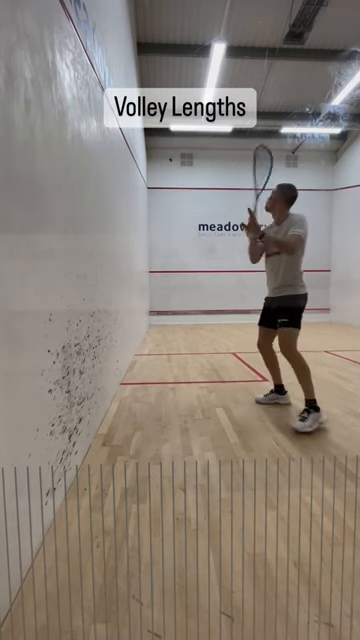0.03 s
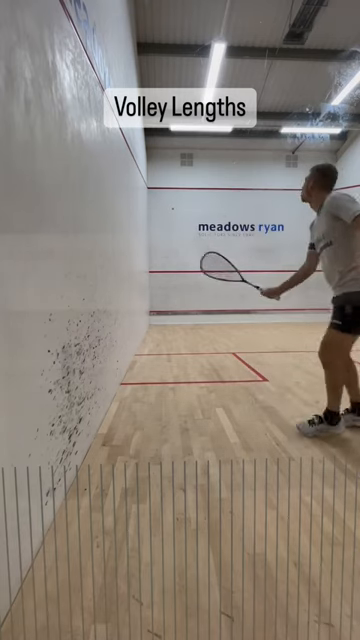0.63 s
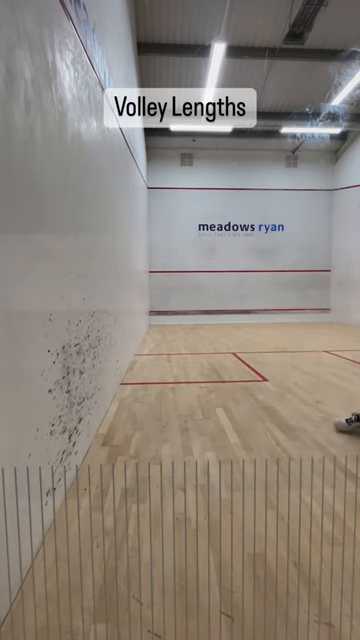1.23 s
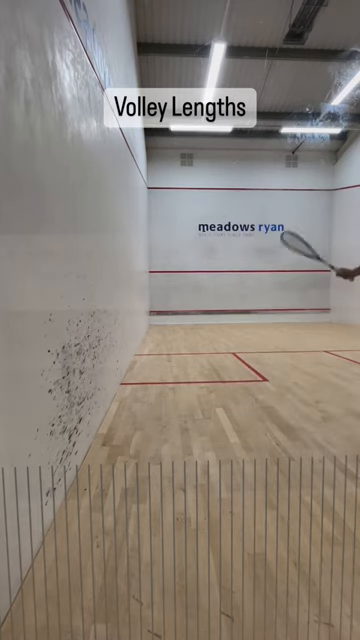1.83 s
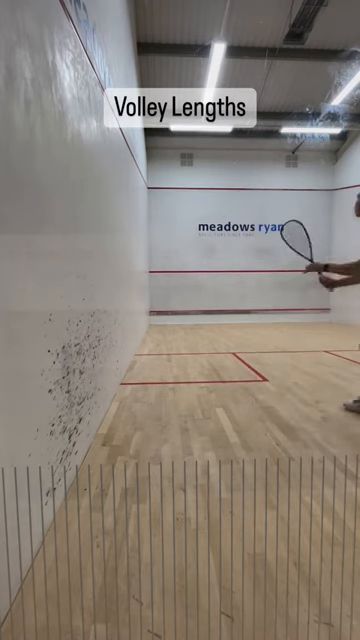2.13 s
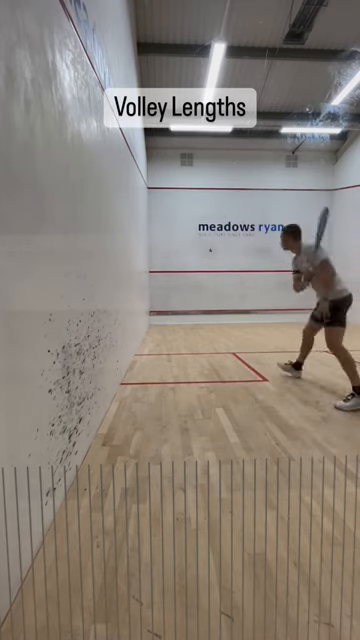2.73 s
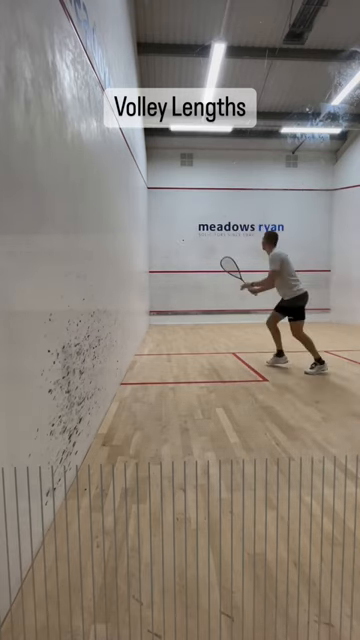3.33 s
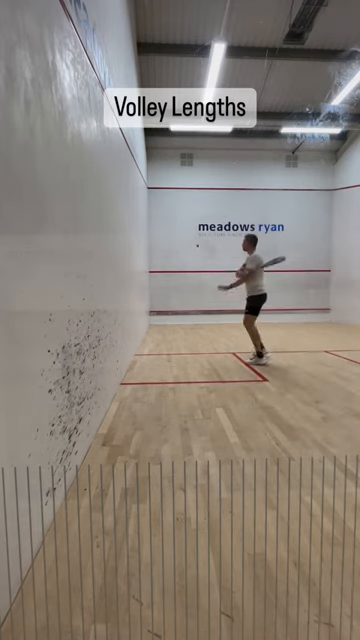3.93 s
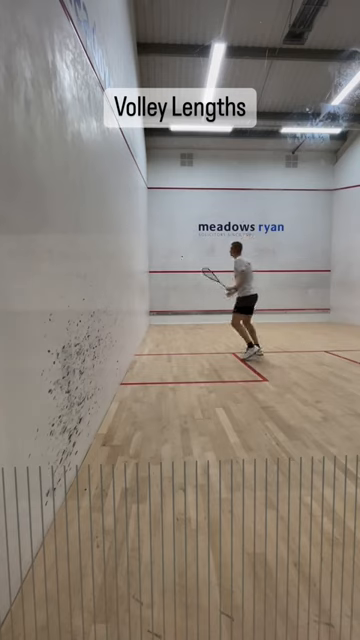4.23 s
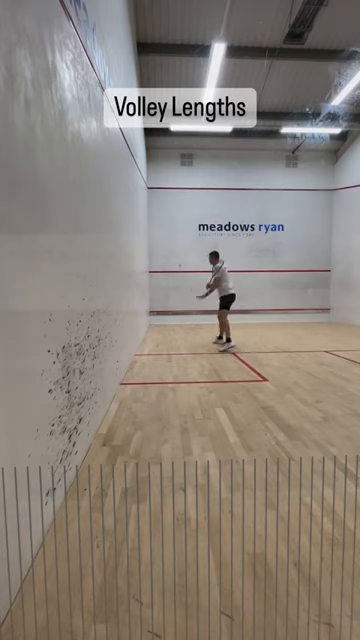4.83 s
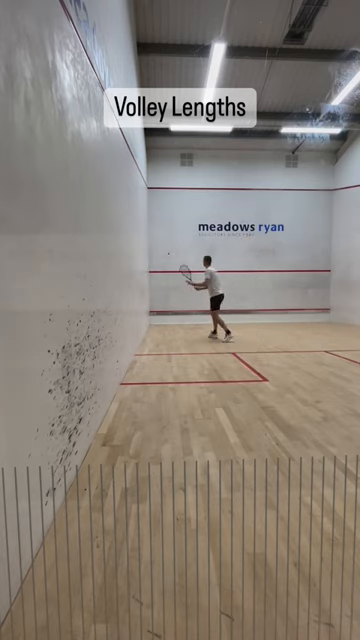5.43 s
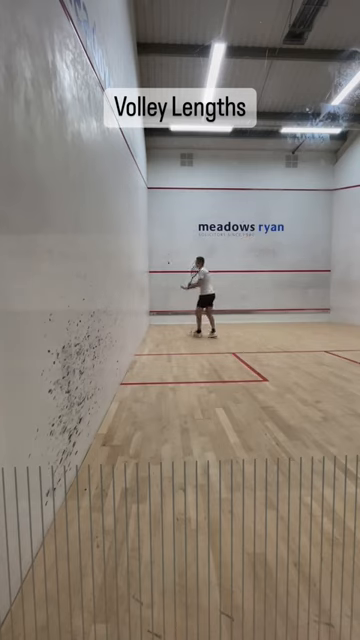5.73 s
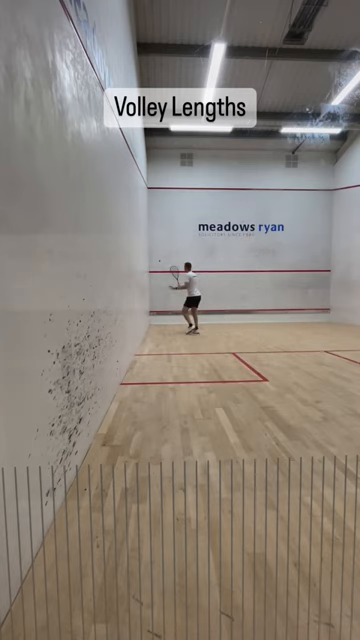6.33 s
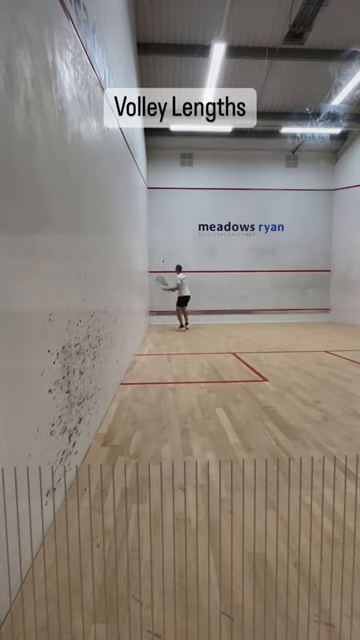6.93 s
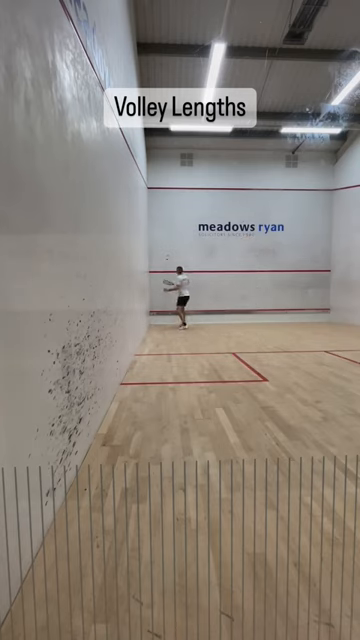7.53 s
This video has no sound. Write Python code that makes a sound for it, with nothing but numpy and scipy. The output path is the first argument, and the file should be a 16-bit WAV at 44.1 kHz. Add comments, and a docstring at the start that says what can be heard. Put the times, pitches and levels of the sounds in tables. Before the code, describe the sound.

Heard from the back of a reverberant squash court, a racket stroke and a hollow wall smack are followed by a loud, close boom as the ball hits the glass. Seven more pinging strokes follow, all but the last answered by the front wall, each gentler and farther away. Soft footsteps thump on springy boards, with a few faint scuffs, and ventilation hums throughout.

```python
"""Solo squash in an echoing court

Heard from the glass back wall, a player volleys while walking away. Each stroke thocks and pings the
strings, then the ball smacks the front wall, both ever more gently. One ball flies back and bangs
the glass. Shoes thud and scuff on the springy wooden floor, and the ventilation hums."""
import sys
import numpy as np
from scipy import signal
from scipy.fft import rfft, irfft, next_fast_len
from scipy.io import wavfile

SR = 44100
rng = np.random.default_rng(int(sys.argv[2]) if len(sys.argv) > 2 else 0)


def int16_out(signal):
    """Quantize to a 16-bit WAV file."""
    q = np.round(np.clip(np.atleast_2d(signal).T, -1, 1) * 32767)
    wavfile.write(sys.argv[1], SR, q.astype(np.int16))


N = 333837

# How long the court echoes: f/Hz, t60/s (the time to fade by 60 dB)
COURT_ECHO = [(60, 2.7), (200, 2.22), (450, 3.5), (1000, 3.5), (2200, 3.4), (4000, 2.86), (6000, 2.02),
              (9000, 1.27)]
# How much left and right differ, against what they share: f/Hz, level/dB
STEREO_WIDTH = [(50, -57.5), (130, -24.5), (260, -20.5), (400, -11.5), (580, -5), (1000, -0.5), (2200, -4),
                (4500, -1), (6500, -2), (7700, 14.5), (9000, 0)]


def amp(db):
    """Turn decibels into a factor to multiply by."""
    return 10 ** (np.asarray(db) / 20)


def along(points, hz):
    """Read a curve of (frequency, value) points at hz, on a log frequency axis."""
    freqs, values = np.transpose(points)
    return np.interp(np.log(hz + 1), np.log(freqs), values)


def resonances(peaks, hz):
    """A colour (level in dB at each frequency) made of steep peaks: f/Hz, width/Hz, level/dB."""
    gain = sum(amp(db) / (1 + ((hz - centre) / (width / 2)) ** 2) for centre, width, db in peaks)
    return 20 * np.log10(gain)


def add(track, s, sound):
    """Mix a sound into the track, starting at s seconds."""
    start = round(s * SR)
    part = sound[..., max(-start, 0):N - start]
    track[:, max(start, 0):max(start, 0) + part.shape[-1]] += part


def noise(colour, size):
    """Stereo noise of the given colour; long, low waves reach left and right alike."""
    hz = np.fft.rfftfreq(size, 1 / SR)
    width = amp(along(STEREO_WIDTH, hz))
    gain = amp(colour(hz)) * (hz > 15)
    white = rfft(rng.standard_normal((2, size)))
    mid, side = irfft(white * gain * [np.ones_like(hz), width] / np.hypot(1, width), size)
    pair = np.array([mid + side, mid - side])
    return pair / np.sqrt(np.mean(pair ** 2))


def burst(colour, t60, rise):
    """A short cluster of echoes that swells and dies; t60 and rise are in seconds."""
    t = np.arange(SR) / SR
    return noise(colour, size=SR) * amp(-60 * t / t60) * (1 - np.exp(-t / rise))


def tail(colour, decay, rise):
    """A wash of ringing in which each frequency dies at its own speed."""
    hz, t, spectrum = signal.stft(noise(colour, size=3 * SR), SR, nperseg=512)
    fade = amp(-60 * t / along(decay, hz)[:, None])
    _, ring = signal.istft(spectrum * fade, SR, nperseg=512)
    age = np.arange(ring.shape[1]) / SR
    return ring * (1 - np.exp(-age / rise))


def gentleness(db, firm_db=-40.5):
    """How many dB a hit falls short of a firm one, which squashes the ball fully."""
    return max(firm_db - db, 0)


def hits(rows, colour, direct_db, early_t60):
    """Each hit arrives straight, then off the nearest walls (both early sound), then fills the court."""
    # Extra colour of the early sound: f/Hz, level/dB
    early_colour = [(100, 6), (400, 4.5), (900, -11), (2500, -1.5), (6000, -2.5), (9000, -6)]
    tilt = [(200, 0.023), (600, -0.11), (4500, 0.57)]  # f/Hz, dB per dB of brightness
    out = np.zeros((2, N))
    for s, db, bright_db, early_db in rows:
        tilted = lambda hz: along(colour, hz) + bright_db * along(tilt, hz)
        early = lambda hz: tilted(hz) + along(early_colour, hz)
        add(out, s, amp(db + early_db + direct_db) * burst(early, t60=0.13, rise=0.00091))
        add(out, s, amp(db + early_db) * burst(early, early_t60, rise=0.0018))
        add(out, s, amp(db) * tail(tilted, COURT_ECHO, rise=0.015))
    return out


def front_wall():
    """The hollow ball flattens on plaster, far down the court; a slow ball sounds duller."""
    # Ball meets wall: t/s, level/dB, share of early sound/dB
    smacks = [(-.35, -34, -6), (.617, -25, -6), (2.014, -28, 1.5), (3.225, -30, 1), (4.333, -33, .5),
              (5.289, -38.5, -0.5), (6.166, -43.5, 0), (6.941, -50.5, -5)]
    # Colour of a smack: f/Hz, level/dB
    smack_colour = [(50, -27), (140, -13), (250, -2), (420, 0.5), (540, -5.5), (700, -10.5), (1200, -11),
                    (2200, -15), (3500, -22.5), (5300, -19.5), (6700, -24), (7800, -24.5), (9000, -31)]
    rows = [(s, db, -1.1 - 0.39 * gentleness(db), early_db) for s, db, early_db in smacks]
    return hits(rows, smack_colour, direct_db=1, early_t60=0.61)


def ventilation(air_db=-46, waver_db=2.0):
    """Air rushes, and the fan's tones waver in pitch and level."""
    # Colour of the rushing air: f/Hz, level/dB
    air_colour = [(20, -13), (35, -11.5), (50, -3.5), (95, 10), (140, -2), (250, -2), (400, -12.5),
                  (600, -9.5), (1000, -16), (2500, -26.5), (6000, -39), (9000, -57)]
    # Fan tones: f/Hz, level/dB, width of the pitch waver/Hz
    fan_tones = [(49.6, -49, 3.5), (209.8, -57.5, 6), (300, -53.5, 3.26), (383.4, -55, 5.4), (488, -58, 10),
                 (599, -66, 4.3), (682.5, -55.5, 3), (700, -63, 1.2)]
    out = amp(air_db) * noise(lambda hz: along(air_colour, hz), size=next_fast_len(N))[:, :N]
    t = np.arange(N) / SR
    wander = lambda: np.interp(t, np.linspace(0, t[-1], num=90), rng.standard_normal(size=90))
    for hz, db, width in fan_tones:
        phase = 2 * np.pi * np.cumsum(hz + width / 2 * wander()) / SR
        stereo_shift = np.arctan(amp(along(STEREO_WIDTH, hz))) * np.array([[1], [-1]])
        out += amp(db + waver_db * wander()) * np.sqrt(2) * np.sin(phase + stereo_shift)
    return out


def racket():
    """The ball thocks on the racket; the strings ring on and their ping hangs in the room."""
    # Strokes, softer as the player nears the front wall: t/s, level/dB, ping against stroke/dB
    strokes = [(.340, -29, -9), (1.676, -31, -13.5), (2.932, -33.5, -7), (4.040, -37, -17),
               (4.975, -40.5, -15), (5.863, -44.5, -19), (6.610, -52, -12), (7.326, -58, -10)]
    # Colour of a thock: f/Hz, level/dB
    thock_colour = [(50, -34), (130, -6), (200, -2), (280, -1.5), (410, -0.5), (580, -10.5), (1050, -9),
                    (1450, -16), (1950, -19), (2600, -17.5), (3700, -20.5), (5400, -16), (7700, -20.5),
                    (9000, -28.5)]
    # Notes of the strings: f/Hz, width/Hz, level/dB
    string_notes = [(802, 25, -11), (1110, 35, -5), (1595, 14, -1), (1654, 14, 1), (2320, 70, -11),
                    (2560, 50, -18)]
    # How long the ping lasts: f/Hz, t60/s
    ping_decay = [(800, 2.0), (2500, 1.56)]
    rows = []
    for s, db, _ in strokes:
        bright_db = -7.5 + 1.15 * gentleness(db)  # played gently, the thock fades and the tick stays
        early_db = -0.5 - 1.3 * gentleness(db)  # soft strokes are played far away
        rows.append((s, db, bright_db, early_db))
    out = hits(rows, thock_colour, direct_db=0.5, early_t60=0.2)
    for s, db, ping_db in strokes:
        ping = tail(lambda hz: resonances(string_notes, hz), ping_decay, rise=0.028)
        add(out, s, amp(db + ping_db) * ping)
    return out


def footsteps(scuff_width_hz=600):
    """Soft rubber soles thump the springy boards and scuff on the varnish."""
    # Footfalls: t/s, level/dB
    steps = [(0.861, -34.5), (.955, -35.5), (2.003, -32), (2.148, -34), (2.862, -41.5), (3.41, -32),
             (4.444, -30), (5.419, -35.5), (5.532, -34.5), (7.148, -40)]
    # Colour of the boards' thud: f/Hz, level/dB
    board_colour = [(25, -27.5), (50, -6.5), (85, 6), (130, -14), (250, -9), (600, -31), (2000, -31),
                    (8000, -71.5)]
    # Scuffing soles: t/s, f/Hz, level/dB
    scuffs = [(4.06, 2600, -53), (4.129, 3050, -55), (5.871, 2500, -62.5), (6.66, 2540, -66)]
    out = np.zeros((2, N))
    for s, db in steps:
        add(out, s, amp(db) * burst(lambda hz: along(board_colour, hz), t60=0.6, rise=0.007))
    for s, centre, db in scuffs:
        scuff = tail(lambda hz: resonances([(centre, scuff_width_hz, 0)], hz), COURT_ECHO, rise=0.02)
        add(out, s, amp(db) * scuff)
    return out


def glass_wall(bang_s=1.052):
    """The ball bangs the nearby pane: it booms, the door chatters and the court answers."""
    # Notes of the bending glass: f/Hz, level/dB, t60/s
    glass_notes = [(37, -28, 1.7), (66, -23, 1.5), (134, -21, .7), (168, -21, .45), (200, -16.5, .55),
                   (264, -27, .6), (284, -28, .6), (322, -28, .5), (395, -23, .45), (500, -30, .7),
                   (603, -22, .48), (650, -30, .6), (738, -29, .42), (908, -27, .42), (1030, -17, .36),
                   (1078, -26, .5), (1160, -28, .3), (1235, -26, .3), (1440, -28, .18), (1816, -29, .25),
                   (1973, -29, .42), (2095, -23, .17), (2430, -33, .15)]
    # How long the noisy part of the bang lasts: f/Hz, t60/s
    pane_decay = [(100, 1), (250, 0.48), (1000, 0.92), (2000, 0.3), (6000, 0.31)]
    # The glass door knocks in its fittings: t/s, level/dB
    door_knocks = [(1.0524, -8.5), (1.0585, -3), (1.0640, -7.5), (1.0720, -16)]
    # Colours of the bang, the door's rattle and the court's answer: f/Hz, level/dB
    bang_colour = [(40, -34), (115, -3.5), (175, 2.5), (300, -3), (460, -18), (640, -4.5), (780, -10.5),
                   (1020, -9), (1400, -17), (1630, -22), (1900, -18), (3000, -34.5), (6000, -31),
                   (9000, -43)]
    rattle_colour = [(100, -10), (500, 6), (780, 4.5), (1000, 15.5), (1400, 7.5), (1630, -4), (1820, 7.5),
                     (2150, -38), (2600, -7.5), (3400, -27), (6000, -18.5), (9000, -30)]
    echo_colour = [(40, -15), (200, 11.5), (500, -1.5), (1100, 5.5), (2000, -14.5), (3200, -64),
                   (6000, -18), (9000, -28.5)]
    out = np.zeros((2, N))
    t = np.arange(3 * SR) / SR
    for hz, db, t60 in glass_notes:
        age = np.maximum(t - 0.0083 * np.sqrt(200 / hz), 0)  # low bending waves travel slower
        sides = rng.choice([-1, 1]) * np.array([[1], [-1]])
        stereo_shift = np.arctan(amp(along(STEREO_WIDTH, hz))) * sides
        loudness = amp(db - 60 * age / t60) * (1 - np.exp(-age / 0.0013))
        add(out, bang_s, loudness * np.sin(2 * np.pi * hz * age + stereo_shift))
    add(out, bang_s, amp(-17) * tail(lambda hz: along(bang_colour, hz), pane_decay, rise=0.0023))
    for s, db in door_knocks:
        add(out, s, amp(db) * burst(lambda hz: along(rattle_colour, hz), t60=0.027, rise=0.00042))
    add(out, bang_s, amp(-31) * tail(lambda hz: along(echo_colour, hz), COURT_ECHO, rise=0.021))
    return out


def scene():
    """Everything that sounds in the court."""
    return racket() + front_wall() + glass_wall() + footsteps() + ventilation()


def record(dry):
    """The camera rounds off the loudest peaks and cuts away the highest treble."""
    ceiling, top_hz = 0.88, 9700
    rounded = dry / (1 + np.abs(dry / ceiling) ** 6) ** (1 / 6)
    size = next_fast_len(N + SR // 2)
    hz = np.fft.rfftfreq(size, 1 / SR)
    treble_cut = 1 / np.sqrt(1 + (hz / top_hz) ** 160)
    return irfft(rfft(rounded, size) * treble_cut, size)[:, :N]


dry = scene()
out = record(dry)
int16_out(out)
```